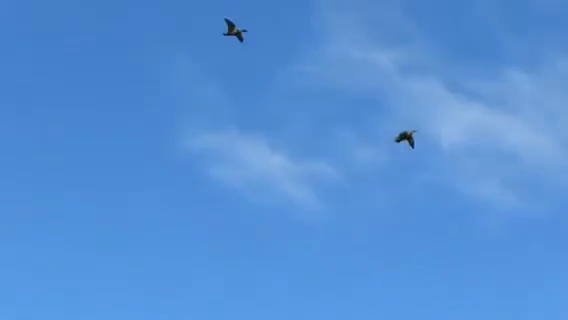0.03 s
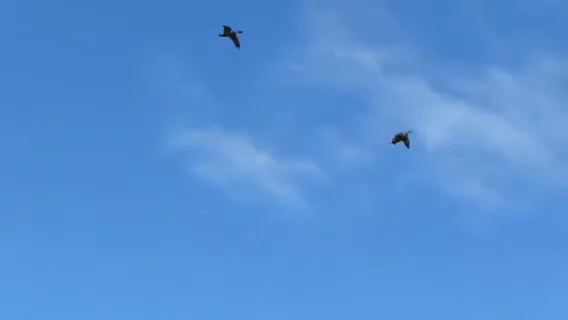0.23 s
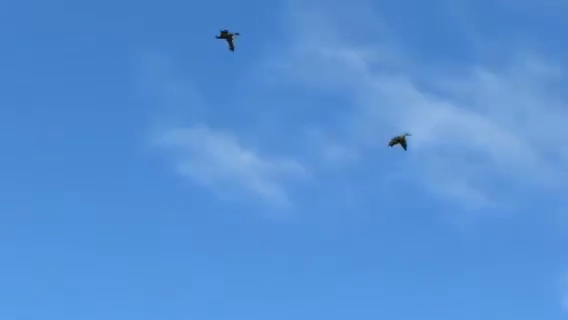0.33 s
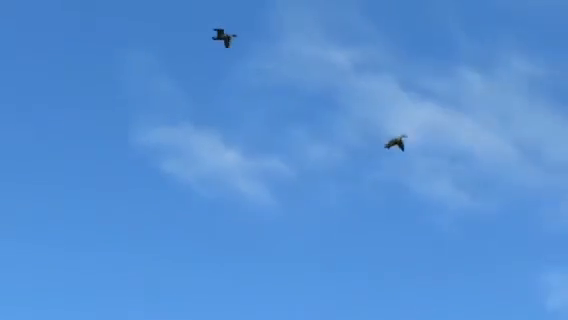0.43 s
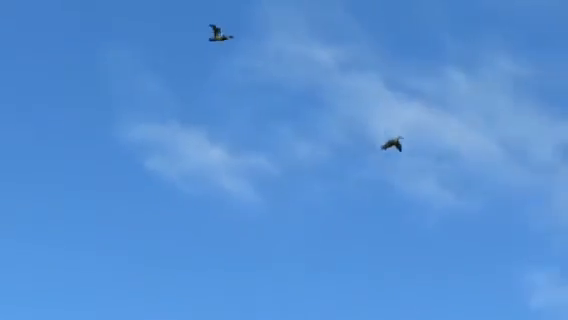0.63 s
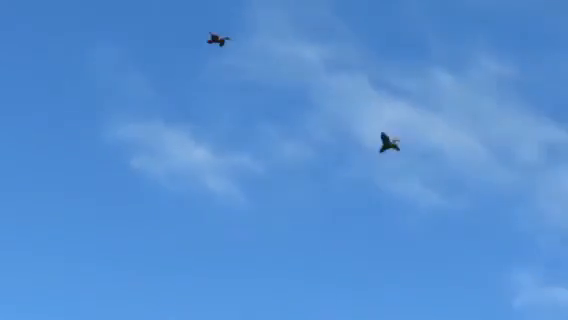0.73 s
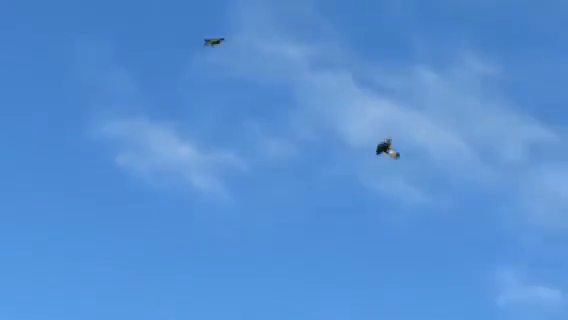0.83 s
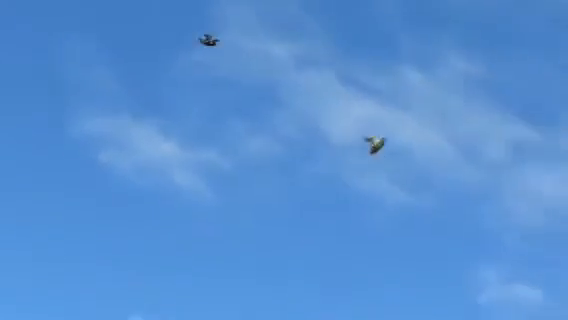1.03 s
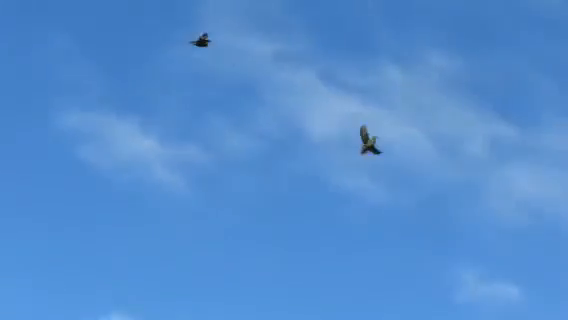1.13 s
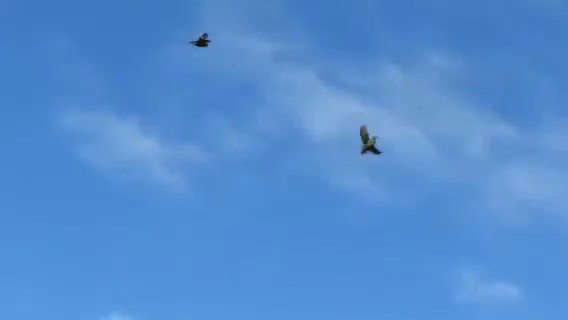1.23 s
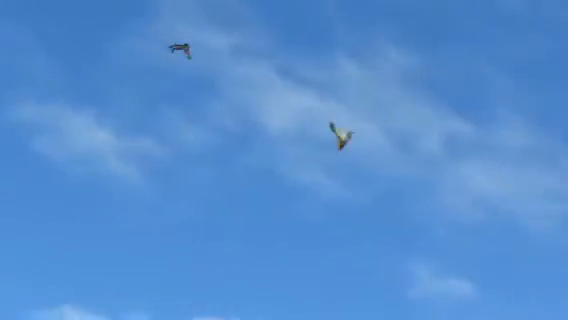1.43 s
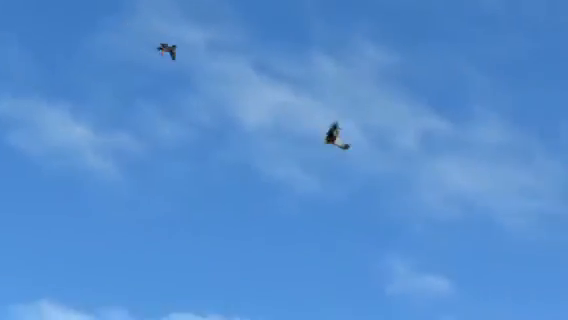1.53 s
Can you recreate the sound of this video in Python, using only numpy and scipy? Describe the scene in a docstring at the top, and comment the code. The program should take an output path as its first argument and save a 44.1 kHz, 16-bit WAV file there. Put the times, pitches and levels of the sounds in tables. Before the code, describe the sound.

A single loud shotgun blast goes off in open country, overloading a small microphone close by. Its echo rolls back in waves with deep booms, growing duller and fainter as it dies away.

```python
"""A shotgun over open country

One shot is fired at ducks, just after a soft knock. The blast and its first reflections overload
the microphone of a small camera close by. The land rolls the shot back in long echoes that grow
duller, with deep booms from far banks and woods. The camera's automatic volume control pushes
the light wind down at the shot and keeps it low."""
import sys
import numpy as np
from scipy import signal
from scipy.fft import rfft, irfft
from scipy.io import wavfile
from scipy.ndimage import uniform_filter1d

SR = 44100
rng = np.random.default_rng(int(sys.argv[2]) if len(sys.argv) > 2 else 0)


def unload_audio(sound):
    """Save the sound as a 16-bit wav file, at the path given as the first command line argument."""
    columns = np.transpose(np.atleast_2d(sound))
    # keep every value between -1 and 1, then stretch to whole-number steps
    steps = np.round(np.clip(columns, -1, 1) * 32767)
    wavfile.write(sys.argv[1], SR, steps.astype(np.int16))


N = 70560
T = np.arange(N) / SR
GRAIN_DB = 3.5  # how uneven the tiny reflections are in strength

# The shock wave and its nearest reflections: start_s, level_db, push_s
SHOCKS = [(0.2236, 32, 0.0013), (0.2293, 43, 0.001), (0.2358, 35.5, .0009), (0.2387, 35.5, .0016),
          (.2567, 37, .0002), (0.2591, 42, .0004), (.2633, 29, .0003), (.269, 37.5, 0.0032),
          (0.2761, 39.5, 0.0013), (.2818, 40, 0.0015), (.289, 28.5, 0.0017)]
# Two sprays of tiny reflections from ground and reeds, the second brighter:
# start_s, level_db, hold_s, fade_s, tilt_db_per_octave
SPRAYS = [(0.2272, 22.5, 0.018, 0.0099, -.5), (0.243, 19.5, .023, 0.014, 1.46)]
# The tone of the sprays before their tilt: pitch_hz, level_db
SPRAY_TONE = [(30, -5.5), (100, -4), (170, 3.5), (350, -1), (700, -2), (1050, -15), (1400, -8.5),
              (2600, -19), (3800, -27.5)]
def blast():
    """Each shock is a sudden push of air, then a longer pull; tiny reflections fill the gaps."""
    out = np.zeros(N)
    for start, db, push_s in SHOCKS:
        progress = np.maximum(T - start, 0) / push_s
        out += amp(db) * (T >= start) * (1 - progress) * np.exp(-progress)
    for start, db, hold_s, fade_s, tilt in SPRAYS:
        swell = (T > start) * np.exp(-np.maximum(T - start - hold_s, 0) / fade_s)
        tone = [(hz, level + tilt * np.log2(hz)) for hz, level in SPRAY_TONE]
        out += amp(db) * swell * noise(tone, GRAIN_DB)
    return out


# Slow swings of the microphone: start_s, pitch_hz, level_db, rise_s, decay_s
MIC_SWINGS = [(.262, 31, 29, 0.015, .045), (.268, 167.7, 28, 0.016, .014)]
def microphone_thump():
    """The overloaded microphone swings slowly and settles."""
    out = np.zeros(N)
    for start, hz, db, rise_s, decay_s in MIC_SWINGS:
        age = np.maximum(T - start, 0)
        swell = np.minimum(age / rise_s, 1) * np.exp(-np.maximum(age - rise_s, 0) / decay_s)
        out += amp(db) * swell * np.sin(2 * np.pi * hz * age)
    return out


# Waves of echo from the land: peak_s, level_db, rise_s, fall_db_per_s
ECHO_WAVES = [(.31, 12.5, 0.033, 36.5), (.43, 21, 0.044, 34.5), (.54, 17, 0.052, 100),
              (0.989, 5.5, .025, 56), (1.23, -5.5, 0.024, 72), (1.389, -16.5, .045, 21)]
# The tone of those echoes and how it changes: pitch_hz, level_db, extra_loss_db_per_s
LAND_TONE = [(25, -9.5, 4), (60, -1, -6), (110, 1, -3), (200, -0.5, 1), (400, -1.5, 6), (750, -6, 5.5),
             (1300, -13, 11), (2070, -21.5, 13.5), (2900, -30.5, 14), (3800, -44.5, 24)]
# The bright rustle of echoes from nearby reeds: pitch_hz, level_db
REED_TONE = [(100, -11), (800, -3), (1800, 3.5), (2800, -2), (3800, -18)]
def echoes(shot_s=0.2238, last_trees_s=1.5):
    """Countless reflections swell and fade in waves; the longer the path, the less treble is left."""
    power = np.zeros(N)
    for peak_s, db, rise_s, fall in ECHO_WAVES:
        rising = np.exp(-(np.minimum(T - peak_s, 0) / rise_s) ** 2)
        power += rising * amp(db - fall * np.maximum(T - peak_s, 0)) ** 2
    flutter_db = 0.75 * wander(500)
    end_loss_db = 7 * np.maximum(T - last_trees_s, 0)  # past the last trees the roll dies faster
    level = np.sqrt(power) * amp(flutter_db - end_loss_db)
    age = np.maximum(T - shot_s, 0)
    hz, db, losses = np.transpose(LAND_TONE)
    scatter = noise(np.transpose([hz, db]), GRAIN_DB)
    bands = np.eye(len(hz))  # each row lets one band of pitches through
    roll = sum(coloured(scatter, hz, band) * amp(-loss * age) for band, loss in zip(bands, losses))
    reeds = amp(3.5 - 40.5 * age) * noise(REED_TONE, GRAIN_DB)
    return (T > shot_s) * lowpass(level * roll + reeds, hz=3710, size=901)


# Deep booms sent back by far banks and woods: peak_s, level_db, half_length_s
FAR_BOOMS = [(0.341, 19, .025), (0.496, 21.5, 0.023), (0.581, 18, .025), (0.634, 15.5, 0.018),
             (0.983, 12.5, 0.024), (1.092, 7, 0.038), (1.265, -1, 0.05), (1.464, -5.5, 0.021)]
def booms(centre_hz=68):
    """Only the bass survives the longest paths: each boom is a few slow, uneven swings."""
    pitch_hz = centre_hz * np.exp(0.28 * wander(400))
    wave = np.sin(2 * np.pi * np.cumsum(pitch_hz) / SR)
    level = sum(amp(db) * np.exp(-((T - peak_s) / half_s) ** 2 / 2) for peak_s, db, half_s in FAR_BOOMS)
    return wave * level


# The dull tone of the knock: pitch_hz, level_db
KNOCK_TONE = [(40, -10), (200, 4.5), (400, -3.5), (850, -7), (1300, -26.5), (3500, -47.5)]
def knock(start_s=0.1785, level_db=-22, decay_s=0.016):
    """A soft knock just before the shot, perhaps from handling."""
    age = np.maximum(T - start_s, 0)
    return amp(level_db) * (age > 0) * np.exp(-age / decay_s) * noise(KNOCK_TONE)


# The tone of the wind, mostly bass: pitch_hz, level_db
WIND_TONE = [(15, -35.5), (25, 1.5), (119, -2.5), (192, -28.5), (222, -13.5), (336, -14), (1080, -26.5),
             (1380, -26), (2920, -36.5), (3600, -46), (4680, -87.5), (7920, -120)]
def wind(level_db=-30.5):
    """Light wind makes a steady, low rush."""
    return amp(level_db) * noise(WIND_TONE)


# The notes at which the camera's shell rings: pitch_hz, width_hz, level_db
SHELL_RINGS = [(263, 41, -6), (494.6, 20, -10.5), (839, 41, -9.5), (1256, 25, -10.5), (1375, 28, -4),
               (1740, 13, -6), (2134, 20, -4), (2253, 16, 0.5), (2454, 20, -6), (2590, 35, -3.5),
               (2676, 27, -0.5), (2860, 30, 3.5), (2945, 22, -0.5), (3180, 30, -1), (3225, 41, -4),
               (3520, 17, -2)]
def camera_shell(x):
    """The shell rings along with every sound that reaches it."""
    out = x.copy()
    for hz, width_hz, db in SHELL_RINGS:
        decay = np.exp(-np.pi * width_hz / SR)
        ring = signal.lfilter([1 - decay], [1, -decay * np.exp(2j * np.pi * hz / SR)], x).real
        out += 2 * amp(db) * ring
    return out


def amp(db):
    """Turns decibels into a number to multiply by."""
    return 10 ** (np.asarray(db) / 20)


def evened(x):
    """Scales a sound to an average power of 1."""
    return x / np.sqrt(np.mean(x ** 2) + 1e-20)


def wander(size):
    """A slow random drift: noise smoothed twice over `size` samples."""
    return evened(uniform_filter1d(uniform_filter1d(rng.standard_normal(N), size), size))


def coloured(x, hz, gains):
    """Turns each listed pitch up or down by its gain, blending in between."""
    freqs = np.fft.rfftfreq(N, 1 / SR)
    return irfft(rfft(x) * np.interp(np.log(freqs + 1), np.log(hz), gains), N)


def noise(tone, grain_db=0):
    """Noise with the given tone, from 18 to 4500 Hz; grain makes some instants stand out."""
    hz, db = np.transpose(tone)
    freqs = np.fft.rfftfreq(N, 1 / SR)
    hiss = rng.standard_normal(N) * amp(grain_db * rng.standard_normal(N))
    shape = amp(np.interp(np.log(freqs + 1), np.log(hz), db)) * (freqs > 18) * (freqs < 4500)
    return evened(irfft(rfft(hiss) * shape, N))


def lowpass(x, hz, size):
    """Cuts the treble above hz; a larger size makes the cut steeper."""
    return signal.oaconvolve(x, signal.firwin(size, hz, window=("kaiser", 9), fs=SR), "same")


def saturate(x, ceiling, knee):
    """Rounds the peaks off under a ceiling; a higher knee makes a sharper corner."""
    return x / (1 + abs(x / ceiling) ** knee) ** (1 / knee)


def scene():
    """Wind, a knock, the shot and its echoes, all coloured by the camera's shell."""
    return camera_shell(wind() + knock() + blast() + microphone_thump() + echoes() + booms())[None]


def record(dry):
    """The volume drops at the shot and barely recovers; peaks are flattened and the treble is cut."""
    threshold_db, max_drop_db, recover_db_per_s = -10, 34, 2
    x = dry[0]
    level_db = 20 * np.log10(abs(x) + 1e-9)
    recovery_db = recover_db_per_s * T
    held_peak_db = np.maximum.accumulate(level_db + recovery_db) - recovery_db
    drop_db = np.clip(held_peak_db - threshold_db, 0, max_drop_db)
    overloaded = saturate(x * amp(-drop_db), ceiling=1.05, knee=11)
    dulled = lowpass(overloaded, hz=3980, size=701)
    flattened = saturate(dulled, ceiling=0.99, knee=31)
    return lowpass(flattened, hz=16000, size=255)[None]


dry = scene()
out = record(dry)
unload_audio(out)
```